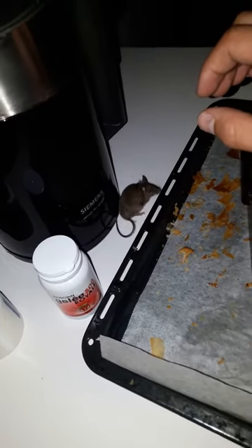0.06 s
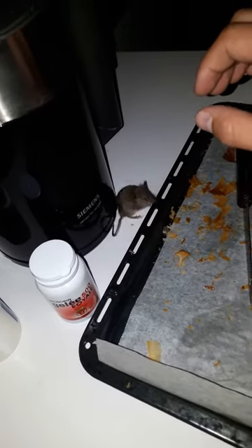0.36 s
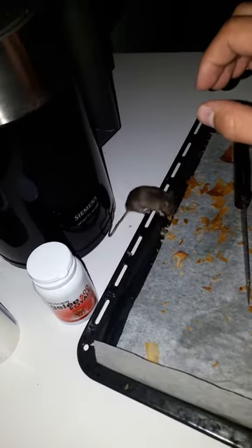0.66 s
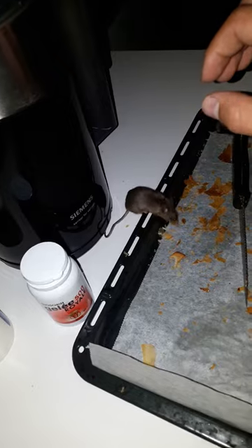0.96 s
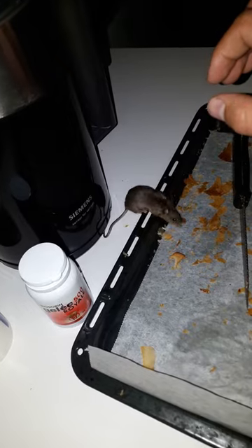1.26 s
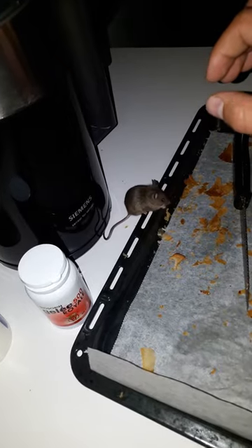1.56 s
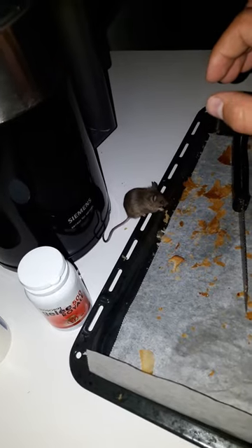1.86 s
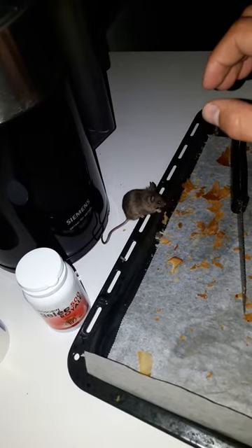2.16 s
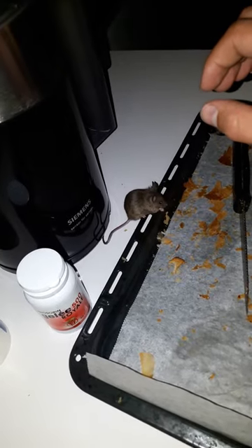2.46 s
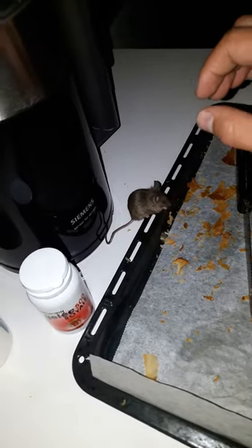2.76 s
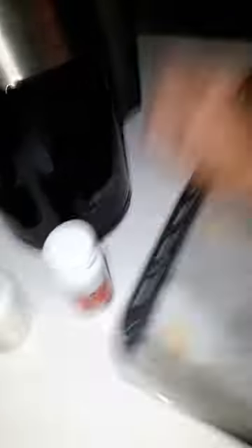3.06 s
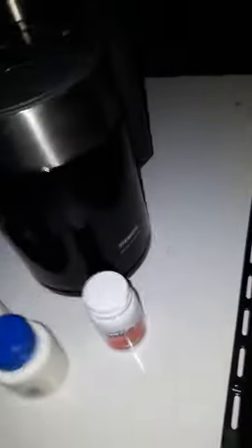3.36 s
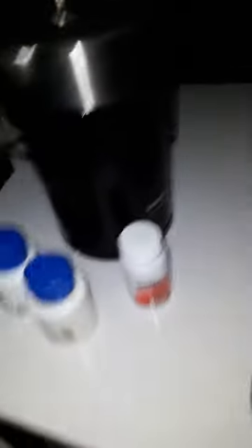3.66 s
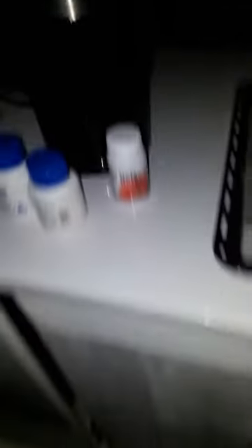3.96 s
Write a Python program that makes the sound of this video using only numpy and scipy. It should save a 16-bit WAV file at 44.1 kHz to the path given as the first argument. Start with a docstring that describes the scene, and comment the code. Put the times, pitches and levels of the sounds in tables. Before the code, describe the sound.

A metal tray is suddenly shoved, clattering and banging loudly in a quiet kitchen.

```python
"""A metal baking tray, close to a stereo microphone in a quiet kitchen at night.
At first only a mouse ticks faintly on baking paper over a low appliance hum. A hand shoves
the tray, which sticks and slips across the worktop, then bangs down and overloads the
microphone. The sheet metal rings and rattles to rest, the paper rustles, the walls answer."""
import sys
import numpy as np
from scipy import signal
from scipy.fft import rfft, irfft
from scipy.io import wavfile
from scipy.ndimage import uniform_filter1d

SR = 44100
rng = np.random.default_rng(int(sys.argv[2]) if len(sys.argv) > 2 else 0)


def digitize_waveform(pressure):
    """Quantize a signal to 16-bit integers and store it at the path in sys.argv[1].

    Rows of a 2-D input are taken as channels; values are limited to [-1, 1].
    """
    field = np.atleast_2d(pressure).T
    bounded = np.clip(field, -1, 1)
    quanta = np.round(bounded * 32767).astype(np.int16)
    wavfile.write(sys.argv[1], SR, quanta)


N = 176400
FREQS = np.arange(N // 2 + 1) * SR / N
TIME = np.arange(N) / SR
TAIL = TIME[:SR]  # one second for anything to ring out

# Table levels are relative; a damping factor multiplies the ring times (t60).
# appliance hum: t/s, fundamental/dB, octave/dB
HUM = [(0, -92, -78), (.2, -71, -100), (.75, -74.5, -94), (.9, -69, -82), (1.3, -73, -70.5),
       (1.6, -73.5, -83), (2.0, -73, -73.5), (2.55, -70, -71.5), (2.85, -65, -75), (3.9, -86.5, -90)]
# spectrum of room tone and microphone hiss: f/Hz, level/dB
AIR_COLOUR = [(25, -36.5), (45, -16.5), (70, -4.5), (100, -5.5), (200, -4.5), (330, -5), (600, -7),
              (1850, -10.5), (3000, -15), (4500, -20.5), (7000, -26.5), (10000, -28.5), (12000, -20.5),
              (15500, -26.5)]
# the mouse's scratches: t/s, level/dB, half-width/s
SCRATCHES = [(1.118, -73, .004), (1.243, -67, .004), (1.394, -69, 0.0082), (1.41, -62, 0.012),
             (2.21, -75, .006)]
# their spectrum: f/Hz, level/dB
SCRATCH_COLOUR = [(1000, -19), (3200, -3), (4000, -7), (4900, -2), (6500, -9), (8600, 1), (10000, -6),
                  (15500, -9)]
# reverberation of the kitchen: f/Hz, t60/s
ROOM_T60 = [(60, 0.31), (250, 0.9), (1000, 0.22), (4000, 0.39), (16000, 0.43)]
# knocks of hand and tray during the shove: t/s, level/dB, brightness/Hz
SHOVES = [(2.9235, -42, 199), (3.037, -2, 1400), (3.0475, -10.5, 1268), (3.051, 5, 2244), (3.056, -7, 2200),
          (3.1275, 6, 3615), (3.136, -3, 3500), (3.148, -2.5, 2800), (3.231, -5.5, 2500),
          (3.251, -9.5, 6890), (3.296, -5, 1863), (3.334, -5, 900)]
# their tone: f/Hz, level/dB
SHOVE_COLOUR = [(30, -25), (90, -18.5), (140, -4.5), (280, -3.5), (450, 4), (720, -2), (1200, -1.5),
                (2000, -7.5), (3000, -12.5), (6000, -19.5), (15000, -27)]
# clear modes of the tray: f/Hz, level/dB, t60/s
TRAY_MODES = [(399, -3, .2), (460, -3, .22), (597, -2, .25), (833, -2, .25), (878, 1, .27), (971, -2, .25),
              (1088, -2, .25), (1161, -3, .25), (1205, -6, .25), (1345, -4, .25), (1698, 1, .27),
              (1998, -2, .25), (2083, 1, .27), (2178, -3, .25), (2399, -1, .3), (2855, 3, .3),
              (3738, 2, .3)]
# ring of the dense sheet-metal overtones: f/Hz, t60/s
SHEET_T60 = [(60, .2), (200, 0.44), (600, 0.11), (1500, 0.58), (3000, 0.2), (7000, 0.37), (16000, 0.053)]
# hiss of the sliding paper: t/s, level/dB
PAPER_SLIP = [(3.04, -46), (3.055, -36.5), (3.115, -42.5), (3.13, -28), (3.18, -35.5), (3.24, -32.5),
              (3.29, -55), (3.35, -37.5), (3.41, -37), (3.47, -30), (3.56, -43), (3.66, -58.5),
              (3.95, -76.5)]
# crinkles of the paper: t/s, level/dB, length/s
CRINKLES = [(3.682, -48.5, 0.022), (3.706, -57, 0.086), (3.839, -64, 0.05), (3.9, -53.5, 0.016),
            (3.928, -57.5, 0.026), (3.962, -72, 0.0079)]
# spectrum of the paper: f/Hz, level/dB
PAPER_COLOUR = [(100, -27), (1000, -1.5), (3000, -1), (5000, 1.5), (8500, 2), (10500, -0.5), (15500, -0.5)]
# force of the rim sliding on the worktop: t/s, level/dB
SLIDE_FORCE = [(3.05, -40), (3.075, -11), (3.125, -9), (3.16, 5), (3.2, 1.5), (3.25, 0.5), (3.3, -0.5),
               (3.355, -2), (3.38, -6.5), (3.403, -15.5)]
# tone of the slide: f/Hz, level/dB
SLIDE_COLOUR = [(30, -30), (95, -27), (140, -4), (280, -7), (440, 6), (700, 0), (900, 4), (1300, 3),
                (1600, -2.5), (2100, -3), (3000, -12.5), (5500, -24.5), (15000, -34.5)]
# the landing and its bounces: t/s, level/dB, brightness/Hz
BANGS = [(3.4165, 4.5, 4000), (3.4205, 5, 6950), (3.4238, -2, 7000), (3.4265, -10, 6000),
         (3.444, -12.5, 2930), (3.462, -1.5, 5060), (3.497, -6.5, 2460), (3.528, -5.5, 1170),
         (3.631, -25, 3400), (3.692, -30.5, 2980), (3.717, -31, 1972)]
# their tone: f/Hz, level/dB
BANG_COLOUR = [(30, -20), (100, -20), (200, -8.5), (320, -9.5), (500, 1.5), (760, -3), (1200, 4),
               (2000, 4.5), (3300, -0.5), (5000, -9), (9000, -15.5), (15000, -19.5)]
# slow ring of the tray's floor once the hand lets go: f/Hz, level/dB, t60/s
PANEL_MODES = [(463, -8, .35), (504, -4, .4), (527, -1, .5), (553, -3, .45), (592, 0, .5), (624, -1, .5),
               (668, -4, .45)]
# modes of the worktop: f/Hz, level/dB, t60/s
WORKTOP_MODES = [(61.5, -32.5, .09), (200, -18, 0.064), (383, -1, 0.024), (598, 1.5, .035)]
# wobbles of the tray's floor as it rocks: t/s, level/dB, half-width/s
WOBBLES = [(3.514, -22.5, 0.026), (3.636, -39, 0.0083), (3.7, -38, 0.024), (3.77, -54, 0.021)]
# spectrum of the last rub: f/Hz, level/dB
RUB_COLOUR = [(200, -30), (650, -6), (850, -12), (1250, 2), (1700, 2), (2600, -15.5), (8000, -22.5)]


def amp(db):
    """Decibels to gain."""
    return 10 ** (np.asarray(db) / 20)


def unit(x):
    """Scale to rms 1."""
    return x / np.sqrt(np.mean(x ** 2))


def decay(t60):
    """A fall of 60 dB every t60 seconds."""
    return np.exp(-np.log(1000) * TAIL / t60)


def curve(rows, column=1):
    """A dB column of a time table as a gain at every sample."""
    rows = np.array(rows)
    return amp(np.interp(TIME, rows[:, 0], rows[:, column]))


def swells(rows):
    """Bell-shaped envelopes from rows of t/s, level/dB, half-width/s."""
    return sum(amp(db) * np.exp(-((TIME - s) / width) ** 2) for s, db, width in rows)


def at_freq(rows, hz):
    """Read a table on a log-frequency axis."""
    rows = np.array(rows)
    return np.interp(np.log(hz + 1), np.log(rows[:, 0]), rows[:, 1])


def through(x, response):
    """Convolve with a response."""
    return signal.fftconvolve(np.atleast_2d(x), response, axes=1)[:, :N]


def colour(x, rows):
    """Minimum-phase filter through points of f/Hz, level/dB."""
    cepstrum = irfft(np.log(amp(at_freq(rows, FREQS))))
    cepstrum[1:N // 2] *= 2
    cepstrum[N // 2 + 1:] = 0
    response = irfft(np.exp(rfft(cepstrum)))
    return through(x, response[None, :SR // 10])


def pan(left_db):
    """Channel gains that put the left ahead by left_db."""
    return amp(np.array([[left_db], [-left_db]]) / 2)


def stereo_noise(wide_hz=1400):
    """Noise alike at both capsules in the bass and unrelated in the treble."""
    mid, side = rfft(rng.standard_normal((2, N)))
    likeness = np.exp(-(FREQS / wide_hz) ** 2)
    return unit(irfft(mid * np.sqrt(1 + likeness) + np.array([[1], [-1]]) * side * np.sqrt(1 - likeness)))


def dense_ring(t60s, damping=1):
    """Countless overlapping modes, each octave dying at its own rate; unit energy."""
    spectrum = rfft(stereo_noise()[:, :SR])
    lowest_hz = 62.5
    octave = np.clip(np.log2((np.arange(SR // 2 + 1) + 1) / lowest_hz), 0, 8)
    ring = 0
    for k in range(9):
        t60 = at_freq(t60s, lowest_hz * 2 ** k) * damping
        band = irfft(spectrum * np.maximum(1 - abs(octave - k), 0))
        ring = ring + band * decay(t60) / np.sqrt(t60)
    return unit(ring) / np.sqrt(SR)


def modes(rows, damping=1, left_lag_s=.0001):
    """Decaying sines of alternating sign that reach the left capsule slightly late."""
    age = np.maximum(TAIL - np.array([[left_lag_s], [0]]), 0)
    return sum((-1) ** k * amp(db) * np.sin(2 * np.pi * hz * age) * decay(t60 * damping)
               for k, (hz, db, t60) in enumerate(rows))


def blows(rows):
    """One short push for each contact; softer contacts last longer."""
    force = np.zeros(N)
    for s, db, hz in rows:
        push = np.exp(-2 * np.pi * hz * TAIL[:SR // 100])
        start = int(s * SR)
        force[start:start + len(push)] += amp(db) * push / push.sum()
    return force


def room_tone(hum_hz=68.5, flutter_db=1.3, third_harmonic_db=-6.5, air_db=-65.5):
    """Still air, microphone hiss and an appliance hum that wavers in pitch and flutters in level."""
    waver = unit(uniform_filter1d(rng.standard_normal(N), SR // 12))
    flutter = unit(uniform_filter1d(rng.standard_normal(N), SR // 25))
    phase = 2 * np.pi * np.cumsum(hum_hz * (1 + 0.018 * waver)) / SR
    buzz = np.cos(2 * phase) + amp(third_harmonic_db) * np.cos(3 * phase)
    hum = curve(HUM) * np.cos(phase) + curve(HUM, column=2) * buzz
    air = unit(colour(stereo_noise(wide_hz=395), AIR_COLOUR))
    return hum * amp(flutter_db * flutter) + amp(air_db) * air


def mouse():
    """Tiny claws and teeth scratch at the paper."""
    return swells(SCRATCHES) * unit(colour(rng.standard_normal((2, N)), SCRATCH_COLOUR))


def walls(sound, gain_db=-11.5, build_s=.012):
    """Reflections build up in the small kitchen and die away behind the close sound."""
    response = dense_ring(ROOM_T60) * np.clip(TAIL / build_s, 0, 1)
    return amp(gain_db) * through(sound, response)


def tray(force, damping, clear_db=-13):
    """The tray's clear modes and dense overtones, driven by a force."""
    clear = unit(modes(TRAY_MODES, damping)) / np.sqrt(SR)
    return through(force, dense_ring(SHEET_T60, damping) + amp(clear_db) * clear)


def shove(gain_db=23):
    """The hand knocks into the tray and damps it, just left of centre."""
    knocks = tray(blows(SHOVES), damping=.65)
    return amp(gain_db) * colour(knocks, SHOVE_COLOUR) * pan(left_db=1.5)


def paper():
    """Baking paper hisses as it slips and crinkles in short bursts of tiny clicks."""
    level = curve(PAPER_SLIP) * (TIME > PAPER_SLIP[0][0])
    for s, db, length in CRINKLES:
        age = np.maximum(TIME - s, 0) / length
        level = level + amp(db) * 2 * age * np.exp(1 - 2 * age)
    grain_db = 2.5 * np.minimum(rng.exponential(size=N // 40), 4)
    crackle = amp(np.repeat(grain_db, 40)) * rng.standard_normal((2, N))
    return level * unit(colour(crackle, PAPER_COLOUR))


def slide(median_slip_hz=85.48, jitter=.35, scatter_db=4, grit_db=-5.5, gain_db=-18.5):
    """The rim sticks and slips unevenly over the worktop, with fine grit between slips."""
    spacing, strength = rng.standard_normal((N // 200, 2)).T
    starts = (np.cumsum(np.exp(jitter * spacing)) / median_slip_hz * SR).astype(int)
    slips = np.bincount(starts, amp(scatter_db * strength), N)[:N]
    friction = unit(slips) + amp(grit_db) * rng.standard_normal(N)
    moving = (TIME > SLIDE_FORCE[0][0]) & (TIME < SLIDE_FORCE[-1][0])
    effort = curve(SLIDE_FORCE) * moving
    judder = colour(tray(friction * effort, damping=.85), SLIDE_COLOUR)
    level = amp(gain_db) * np.sqrt(np.mean(effort ** 2))
    return level * unit(judder) * pan(left_db=1.5)


def bang(ring_db=24, crack_db=22, panel_db=-33):
    """The freed tray lands by the microphone with a crack and rings through its bounces."""
    force = blows(BANGS)
    burst = unit(rng.standard_normal((2, SR)) * decay(t60=0.036)) / np.sqrt(SR)
    crack = amp(crack_db) * through(force, burst)
    ring = amp(ring_db) * tray(force, damping=.75)
    panel = amp(panel_db) * through(force, modes(PANEL_MODES))
    return (colour(ring + crack, BANG_COLOUR) + panel) * pan(left_db=0.5)


def thud():
    """The worktop takes the weight of the landing."""
    return through(blows(BANGS[:1]), modes(WORKTOP_MODES))


def wobble(low_cut_hz=300):
    """The rocking rim chatters on the worktop and shakes the tray's floor."""
    low_cut = signal.butter(2, low_cut_hz, "high", fs=SR, output="sos")
    chatter = signal.sosfilt(low_cut, rng.standard_normal(N))
    panel = unit(modes(PANEL_MODES, damping=.13)) / np.sqrt(SR)
    return through(swells(WOBBLES) * chatter, panel)


def rub(at_s=3.968, level_db=-58.5, half_width_s=0.015):
    """A last soft rub as the tray settles."""
    return swells([(at_s, level_db, half_width_s)]) * unit(colour(stereo_noise(), RUB_COLOUR))


def scene():
    """Tray, paper and mouse close up on the worktop, with the kitchen behind them."""
    near = shove() + slide() + rub() + paper() + mouse()
    landing = bang()
    reflections = walls(near + amp(-1.5) * landing)
    return near + landing + thud() + wobble() + reflections + room_tone()


def record(dry, ceiling=.86, low_cut_hz=30, top_hz=15900):
    """The close microphone flattens the loudest peaks and cuts the rumble and the top."""
    overloaded = dry / (1 + (dry / ceiling) ** 6) ** (1 / 6)
    low_cut = signal.butter(1, low_cut_hz, "high", fs=SR, output="sos")
    top_cut = signal.ellip(8, .2, 60, top_hz, fs=SR, output="sos")
    return signal.sosfilt(top_cut, signal.sosfilt(low_cut, overloaded))


dry = scene()
out = record(dry)
digitize_waveform(out)
```